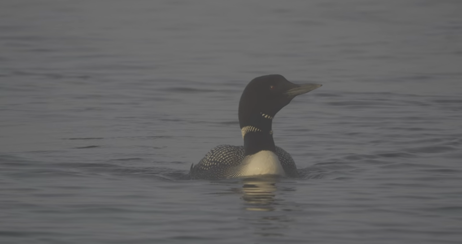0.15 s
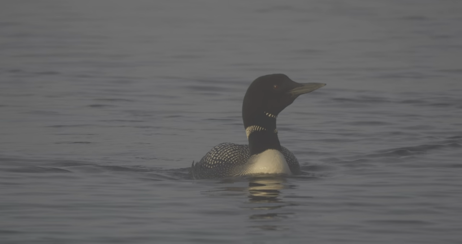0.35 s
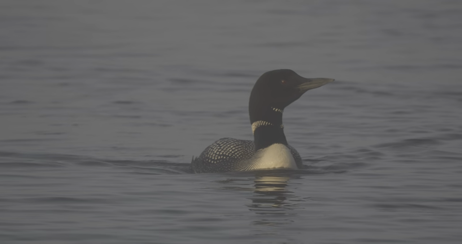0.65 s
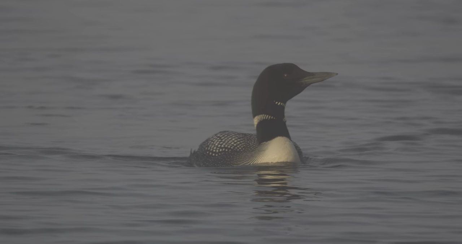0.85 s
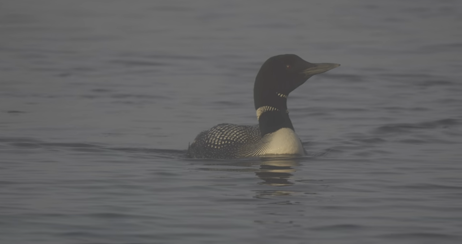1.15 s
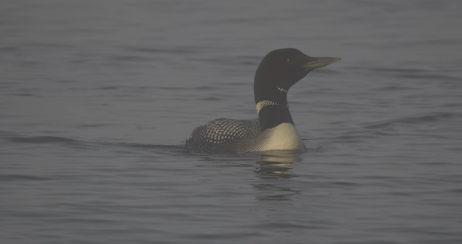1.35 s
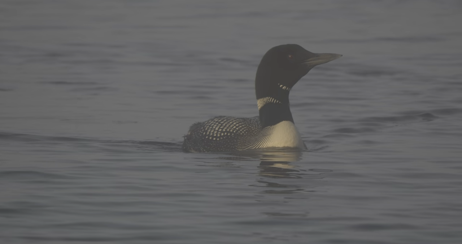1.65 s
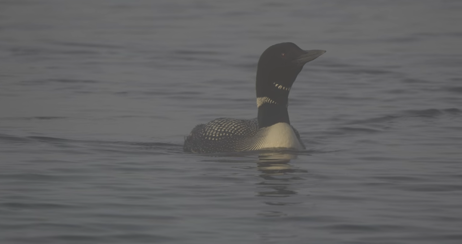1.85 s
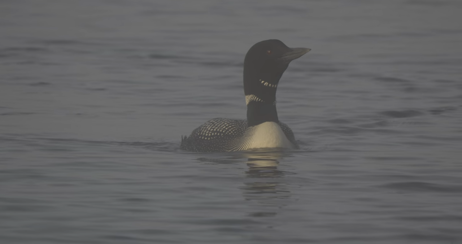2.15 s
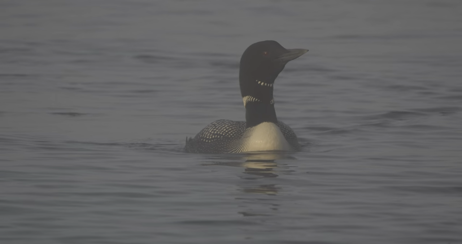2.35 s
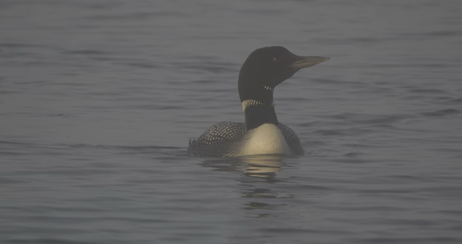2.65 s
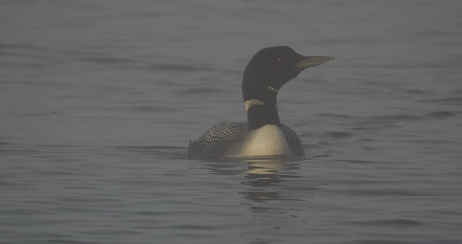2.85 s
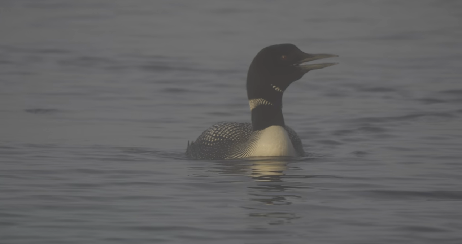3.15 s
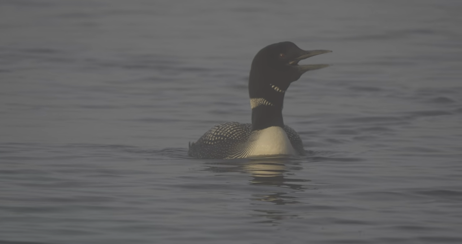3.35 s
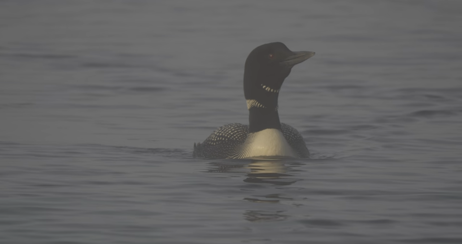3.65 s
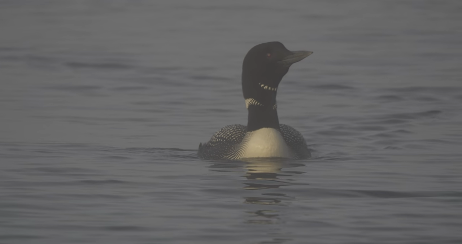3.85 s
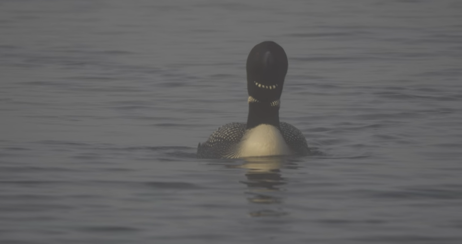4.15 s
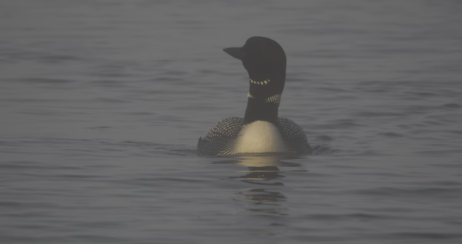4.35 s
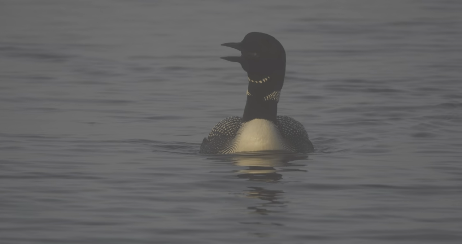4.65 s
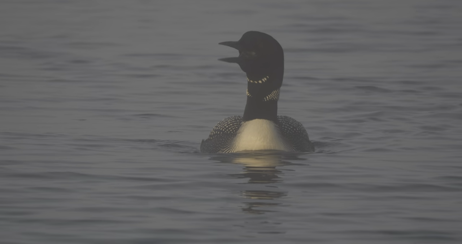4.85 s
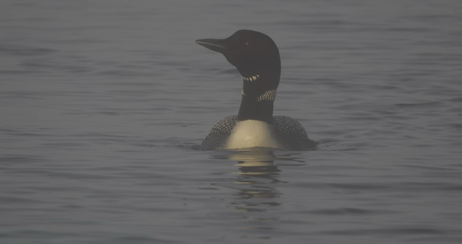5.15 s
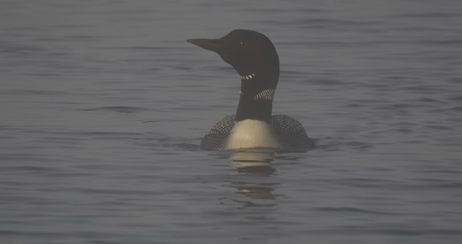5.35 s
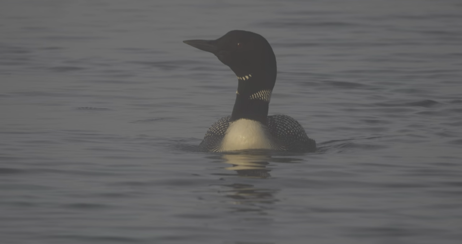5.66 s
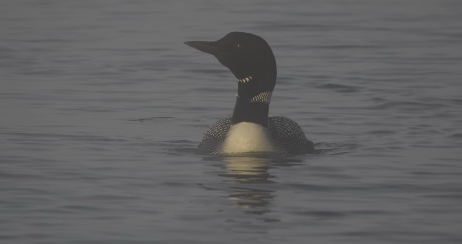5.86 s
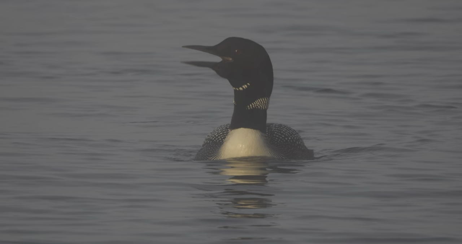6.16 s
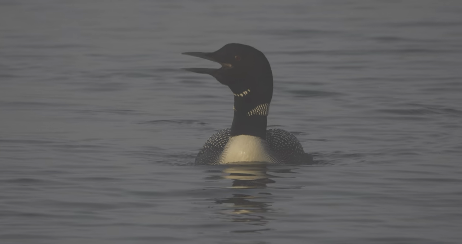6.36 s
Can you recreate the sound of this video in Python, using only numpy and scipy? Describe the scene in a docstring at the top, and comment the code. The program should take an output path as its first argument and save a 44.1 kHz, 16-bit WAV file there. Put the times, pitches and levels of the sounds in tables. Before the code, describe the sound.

Two loons call in turn on a still lake. A faint echo hangs for about a second, then the near bird breaks in with a cracking low note and a fast, clear, quavering tremolo. A second, more distant bird answers lower and softer. They alternate closely to the end, some near calls leaping higher midway. Long diffuse echo from the shores, very low air rumble and hiss; distant microphone outdoors.

```python
"""A still lake, where two loons trade tremolo calls, one near and one farther off.
Each call quavers about ten times a second and jumps between registers: summed partials follow a moving
pitch and effort. Noise with a decaying envelope is convolved with the calls for a long faint shore echo.
A snap of the near bird's voice as a note breaks in is a noise burst. Under it: air rumble and microphone
hiss (filtered noise), a hum that comes and goes (two tones), a trill (falling chips), drips (short tones)."""
import sys
import numpy as np
from scipy import signal
from scipy.fft import rfft, irfft, next_fast_len
from scipy.io import wavfile
from scipy.ndimage import uniform_filter1d

SR = 44100
rng = np.random.default_rng(int(sys.argv[2]) if len(sys.argv) > 2 else 0)


def waveform_to_disk(signal):
    """Save audio, clipped to [-1, 1], as 16-bit WAV at the path in sys.argv[1]."""
    frames = np.transpose(np.atleast_2d(signal))
    scaled = np.clip(frames, -1, 1) * 32767
    samples = np.round(scaled).astype(np.int16)
    wavfile.write(sys.argv[1], SR, samples)


N = 286209

# Spectral shape of air rumble and microphone hiss. Each row: frequency in Hz, relative level in dB.
FLOOR_SPECTRUM = [(30, -2.5), (70, -3.5), (110, -10.5), (260, -9.5), (360, -19), (460, -20.5), (650, -19),
                  (1400, -26), (2500, -31), (15600, -33.5)]
FLOOR_DB = -66.5  # rms
# Tones of the hum. Each row: frequency in Hz, rms level in dB.
HUM_TONES = [(390, -77.5), (269.5, -80)]
# When the hum sounds. Each row: start in seconds, end in seconds.
HUM_SPANS = [(-.1, 0.23), (.57, 2.77), (2.88, 4.3), (4.53, 5.75), (6.13, 6.46)]
# Loudness of the trill. Each row: time in seconds, level in dB.
TRILL_LEVELS = [(0, -92), (.95, -90), (1.05, -105)]
# Scattered energy from the shores. Each row: delay in seconds, relative level in dB.
SHORE_DECAY = [(.02, -0.5), (.15, 1.5), (.4, -5), (.9, 2.5), (1.3, -6), (2.2, -9), (3.001, -27)]
# Colour of the shore echo. Each row: frequency in Hz, gain in dB.
ECHO_COLOUR = [(780, 2.5), (980, 2), (1250, -7), (1520, -3.5), (2300, -11)]
ECHO_DB, EARLIER_DB = -33, -0.5  # gain of the whole echo, of the near bird's call before the start
# Soft water drips. Each row: start in seconds, peak level in dB, pitch in Hz, length in seconds.
DRIP_EVENTS = [(0.384, -65, 679, 0.041), (4.39, -61, 263.5, 0.05), (4.538, -59.5, 271, 0.026)]
# Voice snaps of the near bird. Each row: start in seconds, gain in dB.
VOICE_SNAPS = [(1.148, -50)]

# Windpipe, bill and bounce off the water, for each bird. Each row: frequency in Hz, gain in dB.
NEAR_PATH = [(400, -15.5), (600, 2.5), (820, 0), (930, -8.5), (1050, -1), (1150, -1.57), (1250, -1.5),
             (1500, -11), (1950, -18.5), (2450, -18), (2800, -40.5), (3100, -32), (3400, -31.5),
             (3750, -31), (4200, -33), (5000, -32), (6000, -38), (7500, -41.5), (8300, -49.5),
             (14000, -53.5)]
FAR_PATH = [(500, -3.5), (720, -7.5), (860, -10), (910, -9.5), (965, -22), (1030, -7), (1150, -0.5),
            (1500, -12.5), (1800, -19.5), (2250, -26.5), (2850, -40), (3200, -29.5), (3500, -33),
            (6000, -39.5), (11000, -55)]
# Extra strength of overtones, one row for each register from low to top.
# Each row: partial 2 in dB, partial 3 in dB, partial 4 in dB, partial 5 in dB, all higher in dB.
NEAR_OVERTONES = [(6.5, 0.43, 2.6, -6.5, 0.5), (-4, 5, -3, 3.5, 2.5), (-4.5, 4.4, -0.2, -2, -3.5)]
FAR_OVERTONES = [(4, 0.53, -11, 1.2, 2), (4.5, 2.2, 0.5, 1.5, -.3)]
# Loss of partials 1, 2, 3 and so on in dB per dB of sagging effort, before a factor for the register;
# the last entry serves all higher partials.
NEAR_SLACK = [0.011, 0.74, 0.93, -.6, 0.012]
FAR_SLACK = [0.084, 0.79, 0.55, 0.3]
# Highest pitch of the low and of the high register, in Hz.
REGISTER_BREAKS_HZ = [975, 1350]
# Where the voice cracks and the membrane beats unevenly.
# Each row: start in seconds, end in seconds, roughness from 0 to 1.
CRACKS = [(1.112, 1.147, .15), (1.263, 1.321, .2), (2.553, 2.58, .15), (3.963, 3.99, .15)]
# Contours for each kind of short note. Each row: share of length from 0 to 1, place between lowest and
# highest pitch from 0 to 1, effort change in dB, slope change in dB per octave.
NOTE_SHAPES = { "glide": [(0, 0.04, -13.5, -3.5), (.55, .8, -1.5, 5), (1, 1, -4, 1.5)],
               "hoot": [(0, 0.53, 0.5, 0.5), (.46, 1, -2.5, -10.5), (1, 0, -32, -16)],
               "pickup": [(0, 0.058, -28, 1), (.6, .45, 2, -2), (1, 1, -3.5, 2)], "climb": [(0, 0, -25, -3),
               (.38, .3, 0, -2), (1, 1, -4, -10)], "drop": [(0, 0.84, 1.5, -1), (.25, .45, -2.5, -11),
               (1, 0, -20, -8)], "hold": [(0, 1, -1, -1.5), (.4, .47, -1.5, -0.9), (1, 0, -21.5, -1.5)],
               "sigh": [(0, 1, -13.5, -2.5), (.4, .4, 1, -2), (1, 0, -29, 1.4)], }
# Short notes around the runs. Each row: bird, kind, start in seconds, length in seconds,
# lowest pitch in Hz, highest pitch in Hz, effort in dB, overtone slope in dB per octave.
NOTES = [ ("near", "glide", 1.117, 0.027, 340, 610, -43.5, -6),
         ("near", "hold", 1.706, 0.09, 625, 685, -37, -14.5),
         ("near", "drop", 1.797, .03, 640, 770, -54, -9), ("near", "drop", 3.204, .03, 660, 770, -55, -9),
         ("far", "hoot", 1.849, 0.068, 664, 772, -27.5, -4),
         ("far", "pickup", 1.92, 0.029, 685, 866, -35, -11),
         ("far", "climb", 2.215, .047, 639, 836, -30.5, -8),
         ("far", "drop", 2.262, 0.032, 844, 1040, -30, -2), ("far", "sigh", 2.305, .075, 495, 597, -42, -9),
         ("near", "glide", 2.559, 0.019, 330, 620, -40, -6.5),
         ("near", "hold", 3.145, 0.055, 620, 670, -38, -13),
         ("far", "hoot", 3.386, 0.076, 580, 766, -27, -1.2),
         ("far", "pickup", 3.463, 0.025, 683, 827, -29, -9),
         ("far", "sigh", 3.84, 0.077, 515, 620, -38.5, -7.5),
         ("near", "glide", 3.967, .021, 400, 680, -38.5, -5),
         ("near", "hold", 4.63, 0.032, 610, 665, -38.5, -11),
         ("far", "hoot", 4.804, 0.065, 634, 736, -25.5, -2.6),
         ("far", "pickup", 4.868, 0.031, 708, 847, -32.5, -12.5),
         ("far", "climb", 5.253, 0.04, 595, 766, -31, -8.5),
         ("far", "drop", 5.296, .044, 855, 990, -33, -3),
         ("far", "sigh", 5.336, .06, 480, 620, -45.5, -5.5),
         ("near", "climb", 5.936, .036, 655, 785, -35.5, -1.5),
         ("near", "drop", 5.972, 0.07, 935, 1040, -26, -0.33),
         ("near", "hold", 6.037, 0.035, 599, 660, -40, -11),
         ("far", "hoot", 6.133, 0.062, 643, 722, -26.5, -2.3),
         ("far", "pickup", 6.195, 0.031, 666, 865, -35, -12.5), ]
# The near bird's quiet notes that sag and climb; near 1.3 s two registers sound at once.
# Each note is a list. Each row: time in seconds, pitch in Hz, effort in dB, slope in dB per octave.
SAGS = [
    [(1.147, 749, -35.5, -2), (1.188, 655, -36.5, -8), (1.196, 613, -49.5, -6), (1.203, 640, -40, -12),
     (1.225, 782, -32, 0), (1.245, 840, -30, 2.5), (1.263, 915, -29, -0.5)],
    [(1.263, 906, -37, 0), (1.292, 783, -45.5, -8.5), (1.31, 813, -33, -1.5), (1.321, 944, -32.5, 0)],
    [(1.262, 1180, -38, -13), (1.292, 973, -42, -9), (1.319, 1167, -37, -14.5)],
    [(2.58, 781, -29, -1.5), (2.605, 790, -28.5, 0.5), (2.64, 743, -32.5, -6.5), (2.655, 780, -31.5, -0.5),
     (2.666, 948, -31.5, 0)],
    [(3.989, 781, -29, 0), (4.042, 705, -31, -5.5), (4.058, 774, -29.5, 0), (4.07, 928, -29, -1)],
    [(5.395, 396, -50, -4), (5.417, 443, -43.5, -3), (5.425, 496, -51, -6.5), (5.438, 556, -53.5, -8)],
    [(5.44, 624, -40, -13), (5.48, 810, -28.5, 0.5), (5.495, 944, -30, -1.5)],
]
# Quavering runs in the upper registers. Each row: bird, effort at full pitch in dB, loss in a dip in dB,
# extra at the start in dB, extra at the end in dB, overtone slope in dB per octave, its change in a dip
# in dB per octave, its change at the start in dB per octave, tops and dips (seconds, pitch in Hz).
TREMOLOS = [ ("near", -14, 15.8, -1.45, -23.5, -6, -0.077, -4, [(1.323, 1243), (1.343, 1252),
            (1.391, 975.6), (1.437, 1268), (1.489, 966.5), (1.537, 1261), (1.585, 943), (1.639, 1195),
            (1.69, 932), (1.718, 1010)]),
            ("far", -22.5, 16.3, -0.95, -1.36, -7.5, -0.36, -1.7, [(1.951, 1135), (2.007, 905),
            (2.055, 1145), (2.101, 878), (2.151, 1122), (2.194, 895), (2.212, 852)]),
            ("near", -13.5, 14.55, -2.4, -8, -6, 0.65, -3, [(2.666, 1220), (2.692, 1238), (2.734, 1011),
            (2.78, 1268), (2.828, 1019), (2.874, 1268), (2.926, 981.6), (2.97, 1245), (3.024, 957.4),
            (3.074, 1171), (3.125, 948), (3.143, 915)]),
            ("far", -20.5, 14.4, -1.2, -7.5, -6.5, -1.5, -.1, [(3.49, 1133), (3.548, 897), (3.596, 1141),
            (3.64, 872), (3.688, 1131), (3.738, 860), (3.784, 1072), (3.825, 886), (3.842, 841)]),
            ("near", -13, 14.6, -1.45, -7, -5, -0.41, -4, [(4.071, 1234), (4.094, 1228), (4.135, 1012),
            (4.183, 1258), (4.229, 1020), (4.273, 1266), (4.323, 1012), (4.346, 1199), (4.358, 1293)]),
            ("near", -14.5, 20.5, 1.27, 2.4, -3, 0.97, -7, [(4.358, 1519), (4.42, 1262), (4.466, 1454),
            (4.533, 1152)]), ("near", -23.5, 36.5, -3, -0.084, -4.5, -11.5, -.1, [(4.533, 1012),
            (4.573, 1030), (4.63, 914)]), ("far", -20, 12, -1.1, -4.5, -8, 0, -0.11, [(4.901, 1118),
            (4.955, 900), (5.005, 1136), (5.049, 889), (5.097, 1145), (5.145, 865), (5.191, 1110),
            (5.232, 890), (5.25, 860)]), ("near", -16.5, 13.5, 0.69, -8, -7.5, 1.1, -1.3, [(5.496, 1180),
            (5.538, 996), (5.584, 1221), (5.63, 1008), (5.674, 1236), (5.724, 1001), (5.75, 1181),
            (5.768, 1282)]), ("near", -16.5, 24, -.4, -0.45, -5, 0.91, -5, [(5.768, 1471), (5.824, 1229),
            (5.87, 1411), (5.935, 1127)]), ("far", -20.5, 10.2, 1.7, 1.3, -7, -0.5, -0.13, [(6.222, 1105),
            (6.28, 915), (6.326, 1141), (6.372, 907), (6.424, 1172), (6.466, 881), (6.505, 1098)]), ]

DIP_SHARE = .2  # fractional sag in pitch that brings the full dip loss
DIP_POWER, DULL_S = 1.21, 0.059  # effort falls with this power of the sag; time for the colour to settle
BREAK_DB = -3  # effort change one step before a run overshoots into the top register
HALF_DB = -45.5  # strong-weak alternation, a line at 1.5 times the pitch, before the path's gain
HIGH_SWELL_S = .0073  # time for the membrane to swing up in the high and top registers
RASP, RASP_S = .3, .006  # roughness where a stretch breaks off, and how long it lasts
LOW_CLIMB = 1.85  # exponent: how slowly a low pitch leaves a dip

# cushion: softness of settling into a dip (0-1); climb: how slowly a high pitch leaves a dip (exponent);
# flutter_db: unsteadiness of overtones, dB per octave above the pitch;
# push_db: gain of partials 3 and up, dB per octave a second of rising pitch;
# reserve_db: how far under full effort the swing levels off
NEAR_VOICE = dict(path=NEAR_PATH, overtones=NEAR_OVERTONES, slack=NEAR_SLACK, low_swell_s=.005,
                  cushion=.2, climb=1.05, flutter_db=1.15, push_db=0.367, reserve_db=3)
FAR_VOICE = dict(path=FAR_PATH, overtones=FAR_OVERTONES, slack=FAR_SLACK, low_swell_s=0.008,
                 cushion=.7, climb=1.6, flutter_db=1.87, push_db=0.54, reserve_db=2)


def gain_of(db):
    """Logarithmic level: 20 dB is a factor of ten in amplitude."""
    return 10 ** (np.asarray(db) / 20)


def evened(x):
    """Normalisation: scales to rms 1."""
    return x / np.sqrt(np.mean(x ** 2) + 1e-20)


def read(points, hz):
    """Interpolation: looks up a spectrum on a log-frequency axis."""
    f, value = np.transpose(points)
    return np.interp(np.log(hz + 1), np.log(f + 1), value)


def add(mix, s, sound):
    """Superposition: adds a sound to the mix from time s."""
    part = mix[round(s * SR):][:len(sound)]
    part += sound[:len(part)]


def wander(n, span):
    """Smoothed randomness: twice-averaged noise of rms 1 that changes over span seconds."""
    size = max(round(span * SR), 2)
    smooth = uniform_filter1d(rng.standard_normal(n), size)
    return evened(uniform_filter1d(smooth, size))


def coloured(x, points):
    """Linear filtering: multiplies the spectrum of x by a gain curve."""
    n = next_fast_len(x.shape[-1])
    gain = gain_of(read(points, np.fft.rfftfreq(n, 1 / SR)))
    return irfft(rfft(x, n) * gain, n)[:x.shape[-1]]


def air_and_hiss():
    """Broadband noise: low air rumble and microphone hiss share one sloping spectrum."""
    return gain_of(FLOOR_DB) * evened(coloured(rng.standard_normal(N), FLOOR_SPECTRUM))


def hum(ramp_s=0.032):
    """Frequency and amplitude modulation: two low wavering tones switch on and off together."""
    t = np.arange(N) / SR
    on = sum(np.clip(np.minimum(t - a, b - t) / ramp_s, 0, 1) for a, b in HUM_SPANS)
    tones = 0
    for hz, db in HUM_TONES:
        turns = np.cumsum(hz * (1 + .0015 * wander(N, .08))) / SR
        level = np.sqrt(2) * gain_of(db + 0.44 * wander(N, 0.048))
        tones += level * np.sin(2 * np.pi * turns)
    return on * tones


def trill(per_s=55, top_hz=4620, drop_hz=400, duty=0.28):
    """Pulsed frequency sweep: a far insect or small bird gives quick falling chips at a steady rate."""
    t = np.arange(N) / SR
    progress = np.minimum((t * per_s) % 1 / duty, 1)
    turns = np.cumsum(top_hz - drop_hz * progress) / SR
    chips = np.sin(np.pi * progress) * np.sin(2 * np.pi * turns)
    level_db = np.interp(t, *np.transpose(TRILL_LEVELS)) + 1.8 * wander(N, .05)
    return gain_of(level_db) * evened(chips)


def shores(calls, lumpy_db=1.0):
    """Diffuse reflection: trees and banks scatter returns, so the calls convolve with decaying noise."""
    lead = 2 * SR
    t = np.arange(3 * SR) / SR
    delay, db = np.transpose(SHORE_DECAY)
    tail_db = np.interp(t, delay, db, -80) + lumpy_db * wander(len(t), 0.021)
    tail = rng.standard_normal(len(t)) * gain_of(tail_db)
    # the near bird was already calling, so an echo hangs at the start
    window = np.abs(np.arange(lead) / SR - 1.585) < .315
    earlier = gain_of(EARLIER_DB) * calls[round(1.4 * SR):][:lead] * window
    wet = signal.fftconvolve(np.r_[earlier, calls], tail / np.linalg.norm(tail))[lead:lead + N]
    return gain_of(ECHO_DB) * coloured(wet, ECHO_COLOUR)


def drips():
    """Short tone bursts: each soft drip is a sine under a half-sine envelope."""
    out = np.zeros(N)
    for s, db, hz, length in DRIP_EVENTS:
        t = np.arange(0, length, 1 / SR)
        add(out, s, gain_of(db) * np.sin(np.pi * t / length) * np.sin(2 * np.pi * hz * t))
    return out


def note(kind, start, length, low_hz, high_hz, effort_db, slope_db):
    """Scaled contour: the shape of its kind is laid over one note's length, range, effort and colour."""
    share, place, db, tilt_db = np.transpose(NOTE_SHAPES[kind])
    s = start + share * length
    hz = low_hz + place * (high_hz - low_hz)
    return np.transpose([s, hz, effort_db + db, slope_db + tilt_db])


def sagging(curve, step_s=0.0033):
    """Linear glide: a low note moves straight from turn to turn."""
    columns = np.transpose(curve)
    s = np.r_[np.arange(curve[0][0], curve[-1][0] - step_s / 2, step_s), curve[-1][0]]
    return np.transpose([np.interp(s, columns[0], column) for column in columns])


def tremolo(top_db, dip_db, start_db, end_db, slope_db, dip_slope_db, dull_db, curve):
    """Coupled modulation: effort and overtone slope follow the quavering pitch."""
    s, hz = np.transpose(curve)
    full_hz = hz[:-1].max()
    sag = np.maximum(1 - hz / full_hz, 0) / DIP_SHARE
    effort_db = top_db - dip_db * sag ** DIP_POWER
    effort_db += start_db * (s == s[0]) + end_db * (s == s[-1])
    effort_db += BREAK_DB * (s == s[-2]) * (hz[-1] > full_hz)
    slope_db = slope_db + dip_slope_db * sag + dull_db * np.exp(-(s - s[0]) / DULL_S)
    return np.transpose([s, hz, effort_db, slope_db])


def stretches(bird):
    """Register division: all one bird sings, as a table for each stretch in one register."""
    runs = [tremolo(*row[1:]) for row in TREMOLOS if row[0] == bird]
    notes = [note(*row[1:]) for row in NOTES if row[0] == bird]
    return runs + notes + [sagging(row) for row in SAGS if bird == "near"]


def arches(rows, t, column, rise, fall, cushion=0, dip_s=0.0027):
    """Asymmetric modulation: a column hangs at its tops and turns at its dips, softer with more cushion."""
    s, value = np.array(rows, float)[:, [0, column]].T
    i = np.clip(np.searchsorted(s, t) - 1, 0, len(s) - 2)
    u = np.clip((t - s[i]) / np.maximum(s[i + 1] - s[i], 1e-3), 0, 1)
    rising = np.sin(np.pi / 2 * u) ** rise
    falling = 1 - np.sin(np.pi / 2 * (1 - u)) ** fall
    falling += cushion * (np.sin(np.pi / 2 * u) ** 2 - falling)
    step = value[i + 1] - value[i]
    joined = value[i] + step * np.where(step > 0, rising, falling)
    return uniform_filter1d(joined, round(dip_s * SR), mode="nearest")


def stretch(rows, path, overtones, slack, low_swell_s, cushion, climb, flutter_db, push_db, reserve_db,
            scoop=.04, ringing=.55, jitter=0.0022):
    """Source and filter: each partial of a nearly pure membrane tone takes the path's gain at its pitch."""
    start, end = rows[0][0] - .003, rows[-1][0]
    t = np.arange(start, end + .1, 1 / SR)
    register = np.searchsorted(REGISTER_BREAKS_HZ, max(row[1] for row in rows))  # 0 low, 1 high, 2 top

    # the membrane swings up, a little flat at first
    swell_s = HIGH_SWELL_S if register else low_swell_s
    settled = 1 - np.exp(-((t - start) / swell_s) ** 1.7)
    hz = arches(rows, t, column=1, rise=climb if register else LOW_CLIMB, fall=1.2, cushion=cushion)
    bright_db = push_db * np.gradient(np.log2(hz)) * SR * (register > 0)
    hz = hz * (1 - scoop * np.exp(-(t - start) / 0.0074))
    effort_db = arches(rows, t, column=2, rise=0.85, fall=0.85)
    slope_db = arches(rows, t, column=3, rise=0.16, fall=0.99)

    # cracks and the break at the end roughen the pitch
    crack = sum(r * np.clip(np.minimum(t - a, b - t) / 0.0016, 0, 1) for a, b, r in CRACKS)
    rough = crack + RASP * np.exp(-((t - end) / RASP_S) ** 2)
    hz = hz * (1 + jitter * wander(len(t), .004) + .045 * rough * wander(len(t), .0015))
    turns = np.cumsum(hz) / SR + rng.random()

    if register:  # up high the membrane's swing levels off near full effort
        ceiling_db = effort_db.max() - reserve_db
        soft_db = -1.514 * np.logaddexp(-effort_db / 1.461, -ceiling_db / 1.506)
        effort_db = effort_db.max() - ceiling_db + soft_db

    after = np.maximum(t - end, 0)
    stops = np.exp(-(after / .0035) ** 2)
    # a pitch left at the windpipe's resonance rings on under the next register
    rings = np.maximum(stops, ringing * np.exp(-after / .014 - ((hz[-1] - 1285) / 60) ** 2))
    # in the high and top registers the overtones leave before the end
    thins = np.exp(-(np.maximum(t - end + .014 * (register > 0), 0) / .009) ** 2)

    half_db = HALF_DB + read(path, hz) - 70 * np.abs(np.log2(hz / 1200))
    voice = gain_of(half_db) * np.sin(3 * np.pi * turns) * (register == 1) * stops
    # sagging effort takes a different toll on each partial
    slack_db = np.maximum(effort_db - effort_db.max(), -12) * [.15, 1, .4][register]
    extra_db = [0, *overtones[register]] + [overtones[register][-1]] * (5 if register else 8)
    for k, db in enumerate(extra_db, 1):
        unsteady_db = np.log2(k) * flutter_db * wander(len(t), 0.0074)
        level_db = db + read(path, k * hz) + slope_db * np.log2(k) + unsteady_db + bright_db * (k > 2)
        level_db += slack[min(k, len(slack)) - 1] * slack_db
        edges = settled * rings if k == 1 else settled ** 2 * stops * thins
        voice += gain_of(level_db) * np.sin(2 * np.pi * k * turns) * (k * hz < SR / 2) * edges

    # in a crack every third beat is strong
    uneven = 1 + crack * np.cos(2 * np.pi * turns / 3 + .8 * wander(len(t), .004))
    return start, gain_of(effort_db) * voice * uneven


def loon(bird, voice):
    """Superposition: all stretches of one bird, each placed at its own time."""
    out = np.zeros(N)
    for rows in stretches(bird):
        add(out, *stretch(rows, **voice))
    return out


def nearby(calls, level_db=-31, fade_s=0.029):
    """Early scattering: rippled water around the birds returns a short exponential blur."""
    t = np.arange(SR // 8) / SR
    tail = rng.standard_normal(len(t)) * np.exp(-t / fade_s)
    return gain_of(level_db) * signal.fftconvolve(calls, tail / np.linalg.norm(tail))[:N]


def voice_snaps():
    """Impulsive noise: each voice snap is a noise burst with a very fast exponential decay."""
    out = np.zeros(N)
    t = np.arange(300) / SR
    burst = rng.standard_normal(len(t)) * np.exp(-t / 0.00064)
    snap = coloured(burst, [(900, -20), (1400, 11.0), (9000, -5)])  # (Hz, dB)
    for s, db in VOICE_SNAPS:
        add(out, s, gain_of(db) * snap)
    return out


def scene():
    """Superposition: the birds, their reflections and the quiet background add linearly."""
    calls = loon("near", NEAR_VOICE) + loon("far", FAR_VOICE)
    background = air_and_hiss() + hum() + trill() + drips()
    return (calls + nearby(calls) + shores(calls) + voice_snaps() + background)[None]


def record(dry, edge_hz=15720, offset=0.00032):
    """Band limiting: a slight constant offset, a soft ending and a steep low-pass filter."""
    dry = dry * np.minimum(np.arange(N)[::-1] / 12, 1)
    # odd reflection at both ends lets the filter run through the edges
    padded = np.pad(dry + offset, ((0, 0), (255, 255)), "reflect", reflect_type="odd")
    low_pass = signal.firwin(511, edge_hz, window=("kaiser", 9), fs=SR)[None]
    return signal.oaconvolve(padded, low_pass, "valid")


dry = scene()
out = record(dry)
waveform_to_disk(out)
```